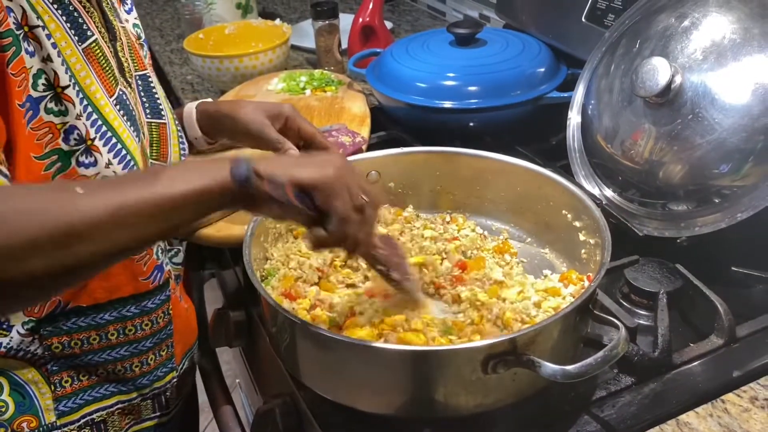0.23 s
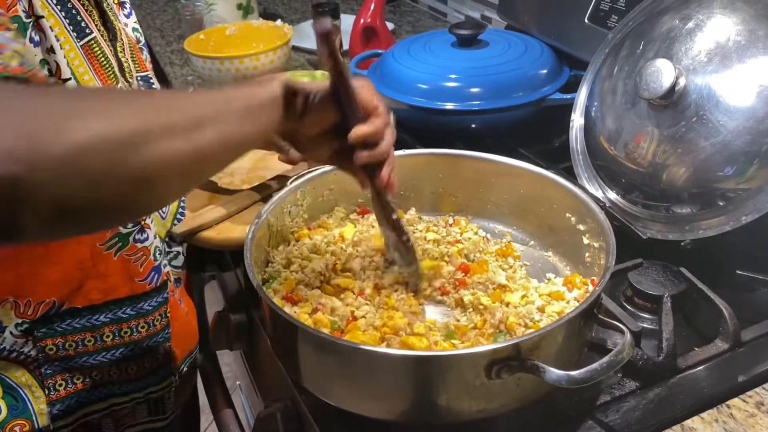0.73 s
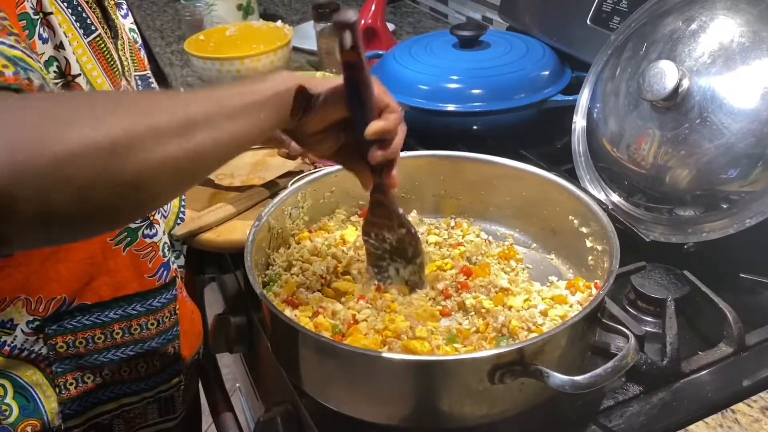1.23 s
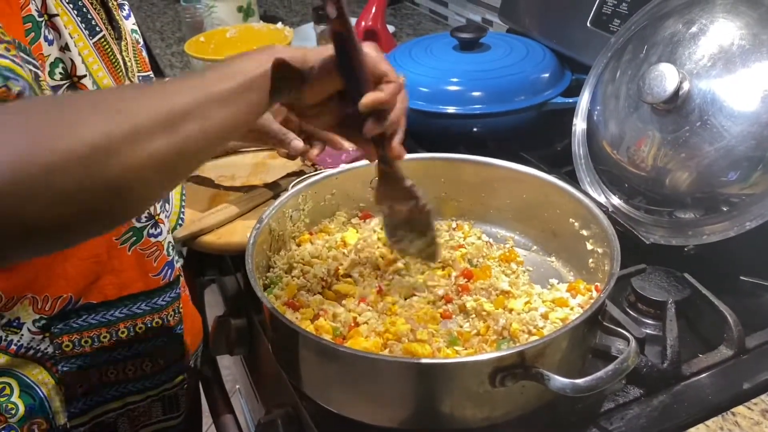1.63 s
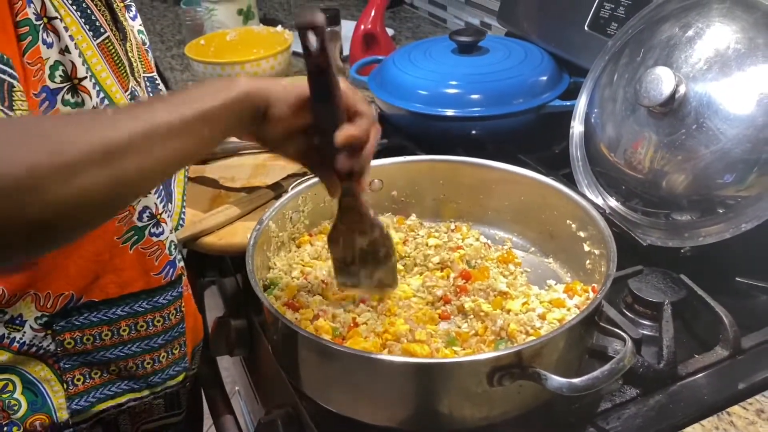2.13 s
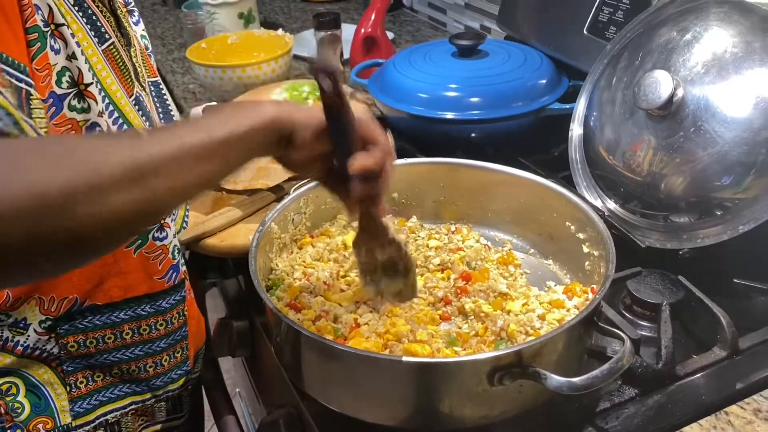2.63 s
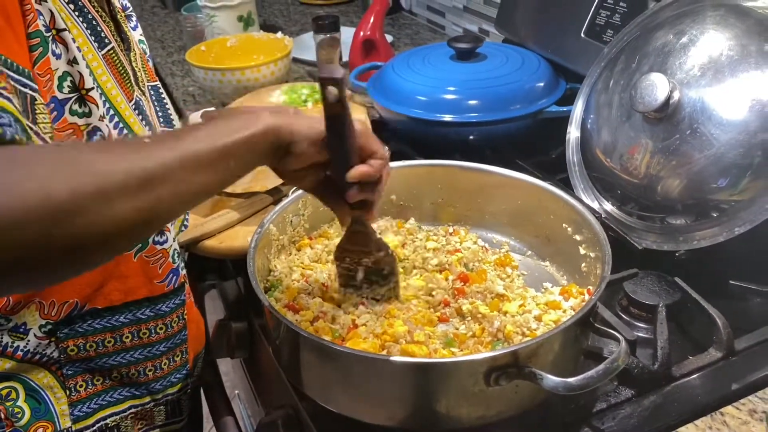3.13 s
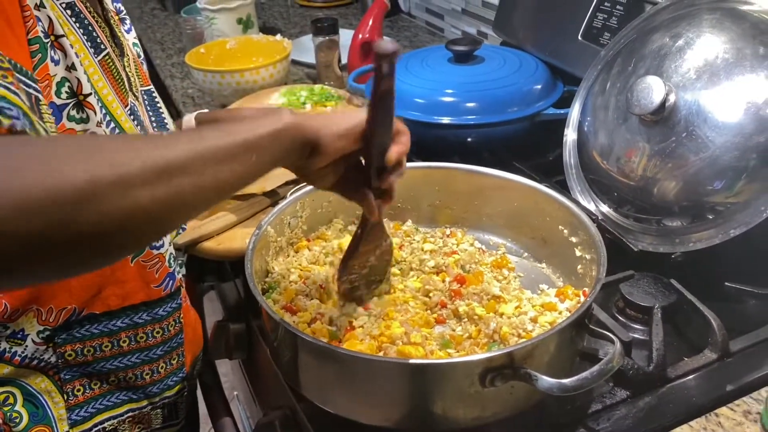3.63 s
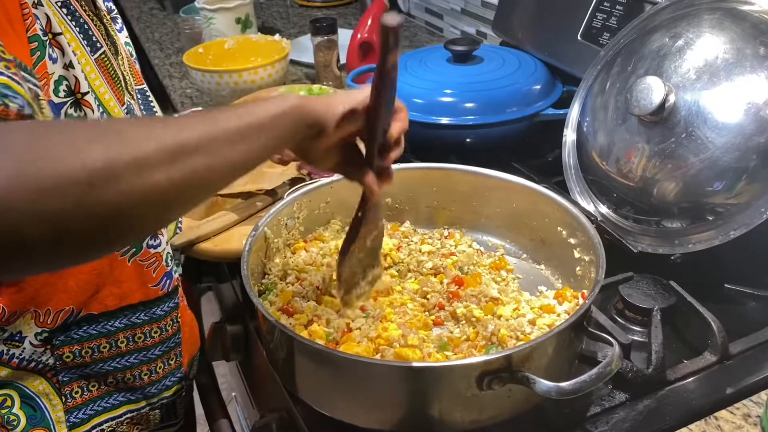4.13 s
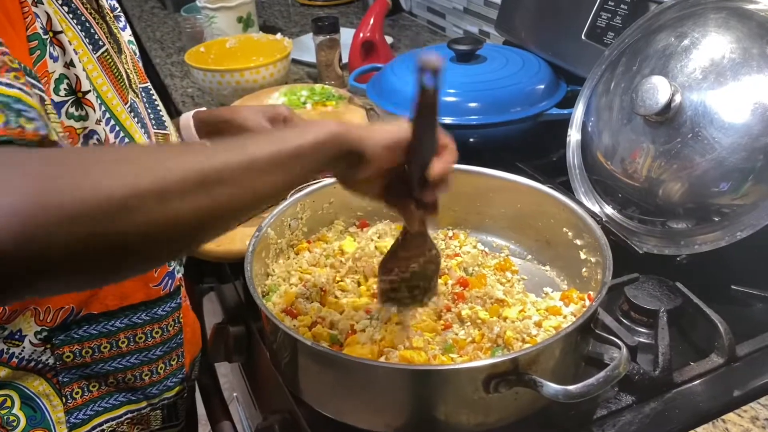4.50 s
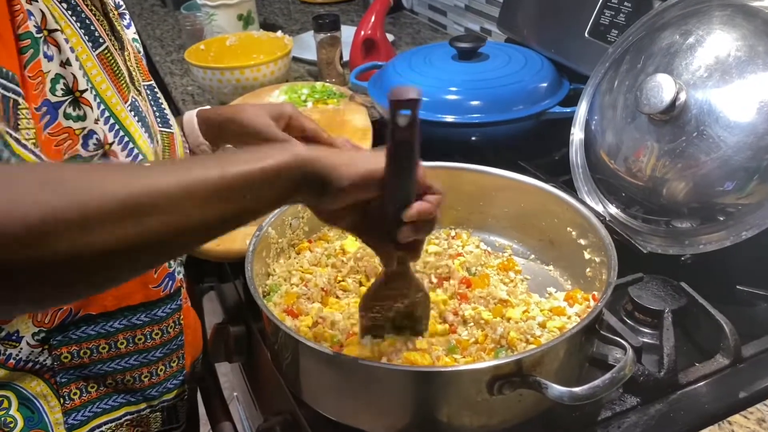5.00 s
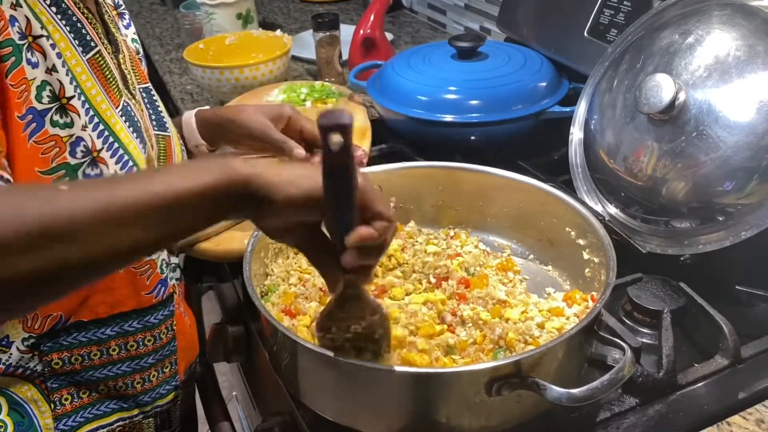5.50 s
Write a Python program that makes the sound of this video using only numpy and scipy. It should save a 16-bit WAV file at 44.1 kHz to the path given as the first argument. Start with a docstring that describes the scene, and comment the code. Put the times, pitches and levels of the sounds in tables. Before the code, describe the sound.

In a small, hard-surfaced kitchen, steady low stove noise and a thin fizz of frying rice come first; at about half a second wooden knocks on a loaded steel pot begin. They run at a brisk, fairly even pace, some muffled, others loud and clacking, turning woodier and sharper at the end. Recorded close, in stereo, with short room echoes.

```python
"""A wooden spatula chops down through rice and knocks the bottom of a wide steel pot, four times a second.
Each knock is damped pot modes, the blade's clack and a noise tick: the food keeps it short and dull.
The cooker's back answers as a few early reflections, the hard kitchen as a decaying tail of noise.
Filtered noise and tiny pops make rice sizzling nearer the right of two microphones,
over the noise rumble of burner and room."""
import sys
import numpy as np
from scipy import signal
from scipy.fft import rfft, irfft, next_fast_len
from scipy.io import wavfile
from scipy.ndimage import map_coordinates

SR = 44100
rng = np.random.default_rng(int(sys.argv[2]) if len(sys.argv) > 2 else 0)


def to_wav(s):
    """Save 16-bit WAV."""
    ch = np.atleast_2d(s).T  # columns
    pcm = np.round(np.clip(ch, -1, 1) * 32767)  # PCM
    wavfile.write(sys.argv[1], SR, pcm.astype(np.int16))


N = 253696

# bed under the knocks, before its small swells: (time [s], rumble level [dB], sizzle level [dB])
BED_LEVELS = [(0.0, -41.5, -46), (.7, -41, -46.5), (2.2, -41.5, -47.5), (3.7, -41.5, -47.5),
              (5.7, -41, -48.5)]


def amp(db):
    """Decibels to amplitude."""
    return 10 ** (np.asarray(db) / 20)


def unit(x):
    """Scale to an RMS of one."""
    return x / np.sqrt(np.mean(x ** 2) + 1e-20)


def along(points, hz):
    """Read a curve of (frequency [Hz], value) points on a log frequency axis."""
    f, v = np.transpose(points)
    return np.interp(np.log(hz + 1), np.log(f + 1), v)


def wobble(rate):
    """A smooth random curve with rate knots a second."""
    knots = rng.standard_normal(int(N * rate / SR) + 4)
    return map_coordinates(knots, [np.arange(N) * rate / SR])


def filtered(x, response):
    """Multiply the spectrum of x by a complex response of frequency."""
    n = x.shape[-1]
    m = next_fast_len(n + 4096)
    return irfft(rfft(x, m) * response(np.fft.rfftfreq(m, 1 / SR)), m)[..., :n]


def stereo(pair, spectrum, alike):
    """Colour two unrelated signals as mid and side, shared out for the given left-right likeness."""
    def mid_side_gains(hz):
        turn = np.arccos(np.clip(along(alike, hz), -1, 1)) / 2
        return amp(along(spectrum, hz)) * [np.cos(turn), np.sin(turn)]

    mid, side = filtered(pair, mid_side_gains)
    return np.array([mid + side, mid - side])


def burner_rumble():
    """Burner and room: steady low noise, nearly alike at both microphones in the bass."""
    # (frequency [Hz], relative level [dB per Hz])
    rumble_colour = [(15, -60), (25, -54), (45, -1), (96, -3.5), (155, -1), (193, -4.5), (236, -6.5),
                     (266, -6), (366, -10.5), (485, -15.5), (1060, -15.5), (1240, -21.5), (1520, -19),
                     (3000, -27), (3900, -122), (6600, -120)]
    # (frequency [Hz], left-right likeness [-1 to 1])
    rumble_alike = [(40, 0.93), (70, 0.99), (130, 0.99), (290, 0.85), (640, 0.15), (1400, 0.38)]
    s, rumble_db, _ = np.transpose(BED_LEVELS)
    rumble = unit(stereo(rng.standard_normal((2, N)), rumble_colour, rumble_alike))
    level_db = np.interp(np.arange(N) / SR, s, rumble_db) + 0.34 * wobble(7.66)
    return amp(level_db) * rumble


def fat_spits():
    """Single spits of hot fat: dry noise clicks a few milliseconds long."""
    # (time [s], starting level before colouring [dB])
    spit_times = [(2.836, -27), (3.291, -35)]
    out, t = np.zeros(N + SR), np.arange(SR // 50) / SR
    for s, db in spit_times:
        out[round(s * SR):][:len(t)] += amp(db - 60 * t / 0.017) * rng.standard_normal(len(t))
    return out[:N]


def from_right(pair):
    """The frying patch lies nearer the right microphone, so its sound reaches the left one later."""
    lag_s, full_turn = 0.0002807, 5.5  # left behind right [s], phase offset reached at 2500 Hz [radians]

    def phase_shifts(hz):
        lag_phase = 2 * np.pi * hz * lag_s - full_turn * np.clip(hz / 2500, 0, 1)
        return np.exp(.5j * np.outer([-1, 1], lag_phase))

    return filtered(pair, phase_shifts)


def sizzling_rice():
    """The rice fizzes in noise and dense tiny pops of uneven strength, with a few spits on top."""
    # (frequency [Hz], level [dB per Hz])
    sizzle_colour = [(500, -50), (1500, -17.5), (3000, -0.5), (5000, 1.5), (7000, -5), (10000, -2.5),
                     (12000, -5.5), (15500, -3)]
    # (frequency [Hz], left-right likeness [-1 to 1])
    sizzle_alike = [(2000, 0.11), (6000, 0.13), (9000, 1), (15000, 1)]
    s, _, sizzle_db = np.transpose(BED_LEVELS)
    t = np.arange(N) / SR
    pop_here = rng.random(N) < 1500 / SR  # about 1500 pops a second
    pops = pop_here * amp(8.6 * rng.exponential(size=N)) * rng.standard_normal(N)
    fizz = rng.standard_normal((2, N)) + [0.064 * unit(pops), 0 * t]
    swell_db = 0.8 * wobble(5.28) + 0.83 * wobble(60)
    fizz = unit(stereo(fizz * amp(swell_db), sizzle_colour, sizzle_alike))
    spits = stereo(np.array([fat_spits(), 0 * t]), sizzle_colour, sizzle_alike)
    return from_right(amp(np.interp(t, s, sizzle_db)) * fizz + spits)


def kitchen(knock):
    """The room's answer to one knock: a noise tail in which each frequency dies at its own speed."""
    # (frequency [Hz], decay time t60 [s])
    room_decay = [(100, 0.13), (260, 0.49), (700, 0.66), (1840, 0.51), (4850, 0.25)]
    # (frequency [Hz], relative level [dB])
    echo_colour = [(150, -6), (300, -6), (550, 0), (800, -4.5), (1010, -4), (1150, -2.5), (1450, -6.5),
                   (1900, 1.5), (2800, -2.5), (5000, 1.5)]
    # (frequency [Hz], left-right likeness of the echo [-1 to 1])
    echo_alike = [(100, 0.55), (300, 0.67), (600, 0.022), (5000, 0.21)]
    hz, t, z = signal.stft(rng.standard_normal((2, SR // 2)), SR, nperseg=256)
    decay = amp(-60 * t / along(room_decay, hz)[:, None])
    tail = signal.istft(z * decay, SR, nperseg=256)[1]
    build_up = 1 - np.exp(-np.arange(tail.shape[1]) / SR / 0.012)
    tail = stereo(tail * build_up, echo_colour, echo_alike)
    return signal.fftconvolve(knock[None], tail / np.linalg.norm(tail[0]), axes=1)


def near_surfaces():
    """The direct path and the early bounces off hard surfaces close to the pot, at each microphone."""
    # (delay [s], left level [dB], right level [dB])
    bounces = [(.0031, -3, -82), (.0058, -10.5, -17.5), (.0095, -34, -2.5), (0.018, -8.5, -25)]
    near = np.zeros((2, SR // 20))
    near[:, 0] = 1
    for delay, left_db, right_db in bounces:
        near[:, round(delay * SR)] = amp([left_db, right_db])
    return near


def ringing(hz, db, t60, swell, t):
    """Damped modes; rice cushions the blow, so each swells over about a cycle."""
    rise = (1 - np.exp(-t * hz / swell)) ** 3
    level_db = db + rng.normal(0, 1.77, hz.shape) - 60 * t / t60
    return -np.sum(amp(level_db) * rise * np.sin(2 * np.pi * hz * t), axis=0)


def strengths(body_db, ring_db, tick_db, place):
    """(frequency [Hz], drive [dB]) of each range of pot modes; the place hit shifts boom and thud."""
    # centres of the thump, boom, thud, body, ring, edge and tick ranges [Hz]
    range_centres = [150, 265, 350, 610, 1000, 1400, 2600]
    low_db = ring_db + 0.99 * (body_db - ring_db)  # the low ranges follow the body, hardly the ring
    thump_db = low_db - 11
    boom_db = low_db - 13.5 + 15 * place  # nearer the wall: more boom, less thud
    thud_db = low_db - 9.5 - 10 * place
    edge_db = ring_db - 1
    return list(zip(range_centres, [thump_db, boom_db, thud_db, body_db, ring_db, edge_db, tick_db + 2.5]))


def wood_tick(tick_db, t):
    """Wood touching steel: a burst of coloured noise with a quick rise and a short decay."""
    # (frequency [Hz], relative level [dB per Hz])
    tick_colour = [(1200, -116), (2500, 2.5), (5000, -4.5), (8000, -16), (15000, -23)]
    tick = unit(filtered(rng.standard_normal(len(t)), lambda f: amp(along(tick_colour, f))))
    return tick * amp(tick_db - 60 * t / 0.049) * (1 - np.exp(-t / 0.0015))


def blade_clack(blade_hz, clack_db, body_db, t):
    """The wooden blade's brief modes, whose pitch shifts with grip and depth in the rice."""
    # (multiple of blade pitch, level [dB], t60 [s], swell [cycles], share following the pot's body [0-1])
    blade_modes = [(.43, 2, 0.022, 1.6, 1), (.56, 1.5, 0.03, 2.5, .8), (1.002, 15, 0.011, 2.59, 0),
                   (1.13, 3, 0.012, 1.36, 0.49), (1.6, -7.5, 0.015, 2.54, 0)]
    ratio, mode_db, t60, swell, share = np.transpose(blade_modes)[..., None]
    level_db = mode_db + clack_db + share * (body_db - clack_db)
    clack = ringing(ratio * blade_hz, level_db, t60, swell, t)
    # a soft contact drives little above 1.6 kHz
    return filtered(clack, lambda f: (1500 ** 2 / (1500 ** 2 - f * f + 1j * f * 1300)) ** 2)


def at_microphones(pair):
    """Tilt the knocks between the microphones by frequency; long waves reach both alike."""
    # (frequency [Hz], left over right [dB])
    left_over_right = [(250, -5), (450, .5), (3000, 1)]
    pair = filtered(pair, lambda f: amp(np.outer([.5, -.5], along(left_over_right, f))))
    mid = np.mean(pair, axis=0)
    side = filtered(pair[0] - mid, lambda f: (1j * f / (180 + 1j * f)) ** 2)
    return np.array([mid + side, mid - side])


def spatula():
    """Each blow lands elsewhere in the pot and so drives the ranges of modes at new strengths."""
    # knocks: (time [s], pot body level [dB], brighter ring level [dB], blade clack level [dB],
    # wood-on-steel tick level [dB], place [-1 = middle of pot, 1 = wall], blade pitch [Hz])
    knock_list = [(0.445, -24, -54, -57, -51, 0.41, 1120), (0.670, -9, -15.5, -16, -36.5, 0.15, 1333),
                  (0.928, -35, -46, -47, -52, -0.52, 1224), (1.144, -9, -11, -8, -35.5, -0.073, 1313),
                  (1.409, -12.5, -16, -16, -44, 0.16, 1340), (1.658, -9.5, -16, -15.5, -35.5, 0.056, 1310),
                  (1.905, -28, -55, -37, -44.5, -0.25, 1200), (2.140, -23, -36, -46, -49, 0.034, 1190),
                  (2.367, -23.5, -39, -38, -45, 0.31, 1184), (2.604, -13, -18.5, -19.5, -45.5, 0.37, 1314),
                  (2.834, -15.5, -20, -20.5, -45.5, 0.057, 1294),
                  (3.055, -9.5, -11, -11, -35.5, -0.32, 1346), (3.296, -22, -38, -26, -50, -0.75, 1050),
                  (3.514, -10.5, -8.5, -10, -35.5, -0.14, 1356), (3.765, -18, -20.5, -20, -48, -0.61, 1263),
                  (3.986, -15, -15.5, -13.5, -44, -0.63, 1326),
                  (4.226, -12, -15.5, -16.5, -37, -0.18, 1310), (4.459, -9, -10.5, -9, -31.5, 0.008, 1319),
                  (4.667, -12.5, -17.5, -14.5, -43, 0.17, 1316), (4.922, -20, -40, -24.5, -45, 0.34, 963),
                  (5.168, -11.5, -13, -9, -38, 0.33, 1084), (5.404, -12, -11, 0, -36, 0.64, 1100),
                  (5.648, -13.5, -10, -3, -33.5, 0.67, 1105)]
    # modes of the loaded pot: (frequency [Hz], level [dB], t60 [s], swell [cycles])
    pot_modes = [(152.7, 0, 0.16, 1.11), (274.2, 4.5, .12, 1.54), (323, 8.5, 0.053, 1.3),
                 (428.4, -3.5, 0.091, 1.2), (489.4, 5, 0.038, 1.26), (544, 1, 0.042, 1.23),
                 (692, -3, 0.047, 1.78), (926.8, 1, 0.04, 1.38), (994, 18, 0.021, 3.96),
                 (1167, -4.5, 0.027, 1.17), (1446, -8.5, 0.068, 0.59), (1764, -6, 0.03, 1.57),
                 (1897, -9, 0.032, 1.3), (2359, 2.5, 0.022, 1.6), (2980, 3.5, 0.011, 0.81),
                 (3473, -4, 0.022, 0.96), (4560, -35, 0.015, 1.4)]
    echo_db, clack_echo_db = -1.5, -4.5  # room under the knock, and the clack's further loss there [dB]
    out, t = np.zeros((2, N + SR)), np.arange(SR // 5) / SR
    hz, mode_db, t60, swell = np.transpose(pot_modes)[..., None]
    near = near_surfaces()
    for s, body_db, ring_db, clack_db, tick_db, place, blade_hz in knock_list:
        drive_db = along(strengths(body_db, ring_db, tick_db, place), hz)
        ring = ringing(hz, mode_db + drive_db, t60, swell, t)
        clack = blade_clack(blade_hz, clack_db, body_db, t)
        tick = wood_tick(tick_db, t)
        direct = signal.fftconvolve((ring + clack + tick)[None], near, axes=1)
        # the blade faces the microphones and feeds the room less than the pot does
        echo = amp(echo_db) * kitchen(ring + amp(clack_echo_db) * clack + tick)
        start = round((s + .0004) * SR)  # sounds 0.4 ms after the listed time
        out[:, start:][:, :direct.shape[1]] += direct
        out[:, start:][:, :echo.shape[1]] += echo
    return at_microphones(out[:, :N])


def scene():
    """Burner and room behind, rice sizzling to the right, the spatula in front."""
    return burner_rumble() + sizzling_rice() + spatula()


def record(dry):
    """The microphones lose the deepest bass; a short fade closes the sound; a band limit cuts the top."""
    # closing fade: (start [s], end [s])
    fade_span = (5.705, 5.745)
    top_hz = 15670
    fade = np.interp(np.arange(N) / SR, fade_span, [1, 0]) ** 2
    return filtered(dry * fade, lambda hz: (1j * hz / (28 + 1j * hz)) ** 2 * (hz < top_hz))


dry = scene()
out = record(dry)
to_wav(out)
```